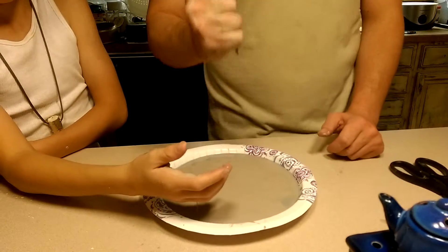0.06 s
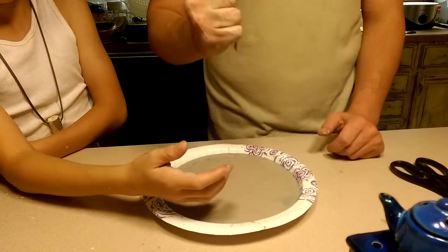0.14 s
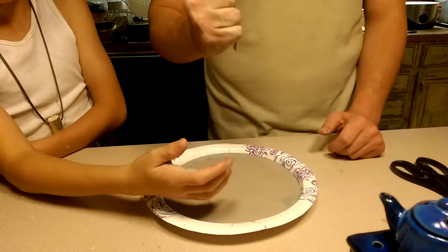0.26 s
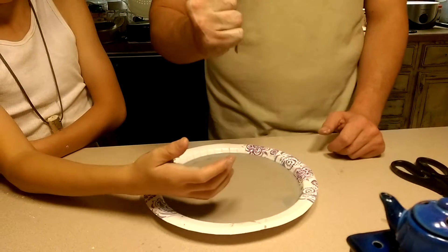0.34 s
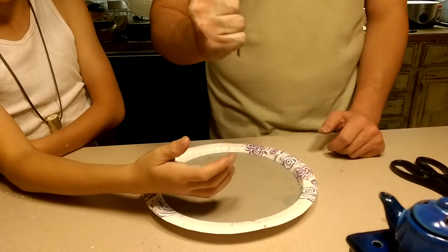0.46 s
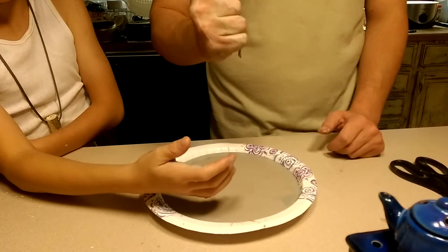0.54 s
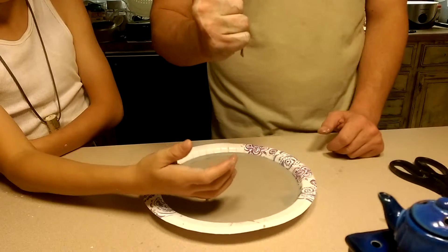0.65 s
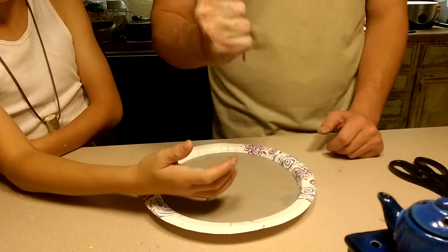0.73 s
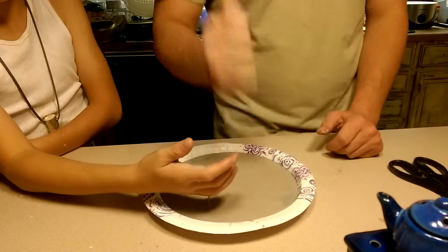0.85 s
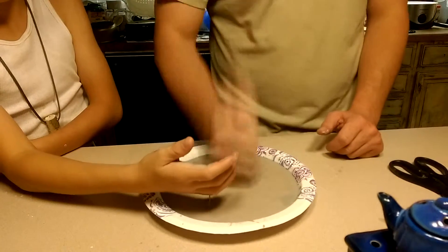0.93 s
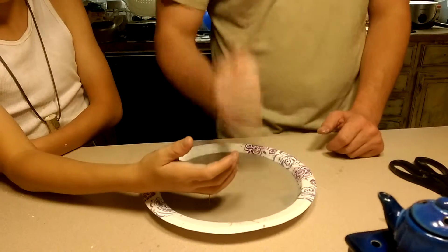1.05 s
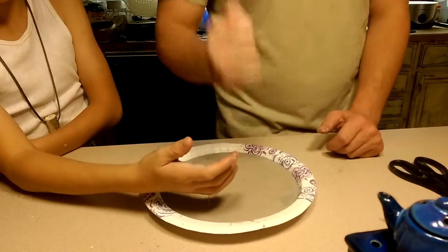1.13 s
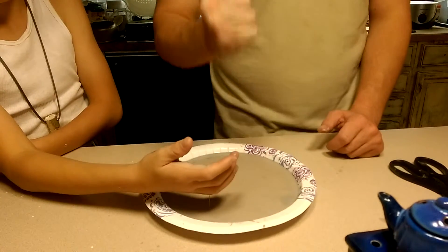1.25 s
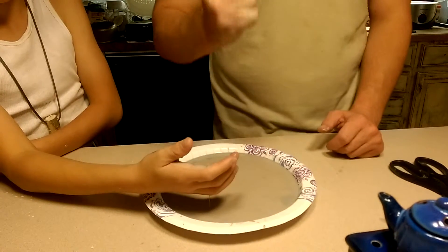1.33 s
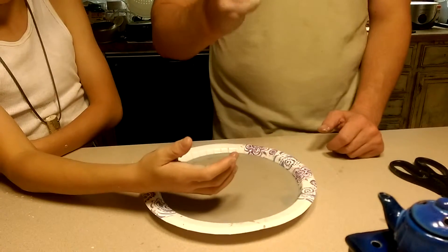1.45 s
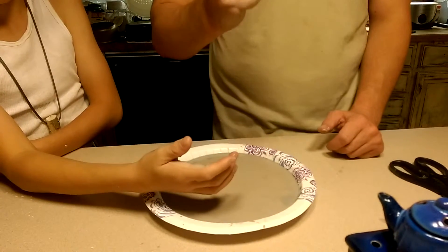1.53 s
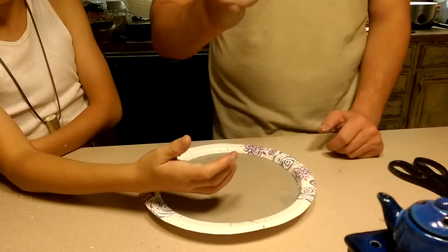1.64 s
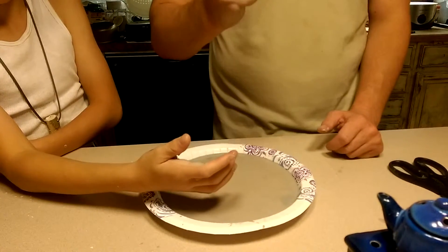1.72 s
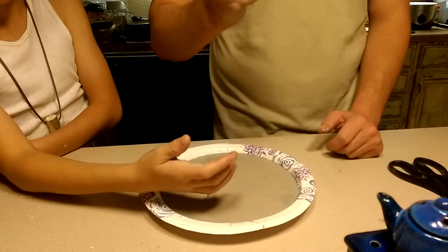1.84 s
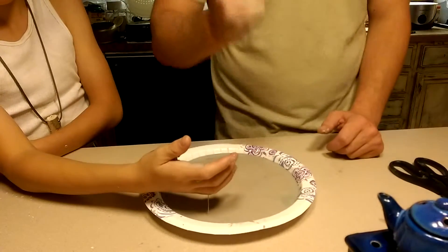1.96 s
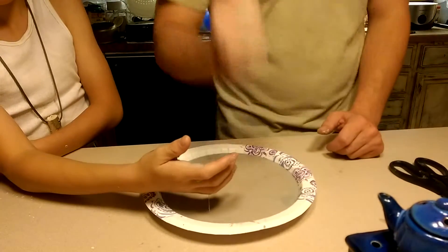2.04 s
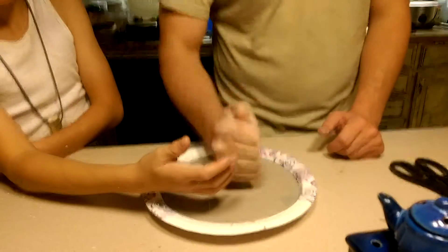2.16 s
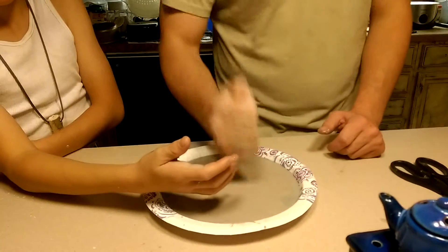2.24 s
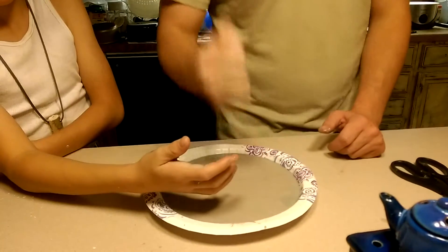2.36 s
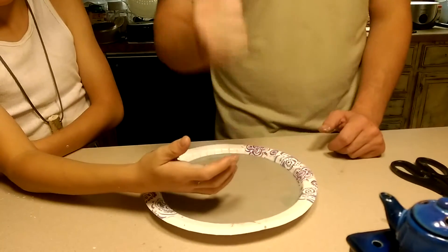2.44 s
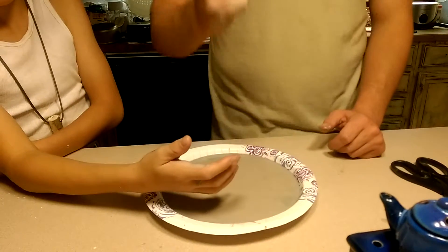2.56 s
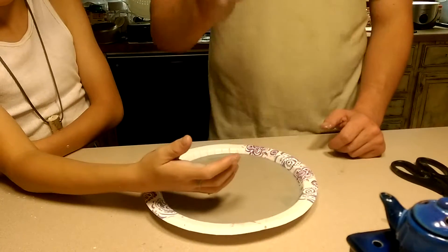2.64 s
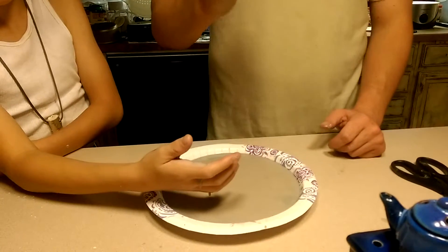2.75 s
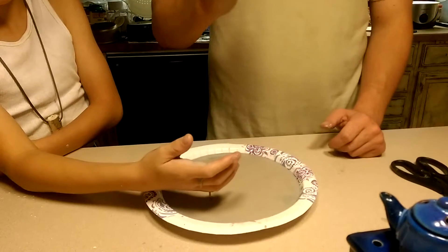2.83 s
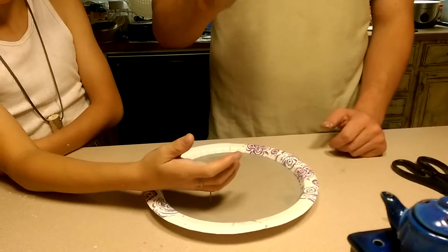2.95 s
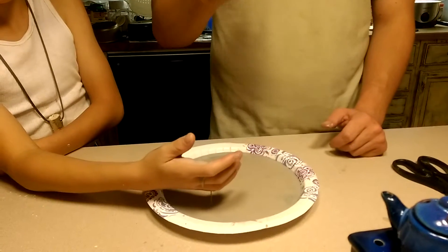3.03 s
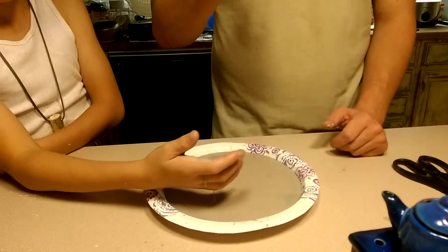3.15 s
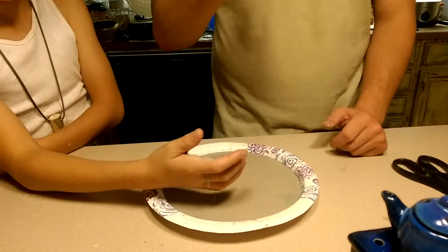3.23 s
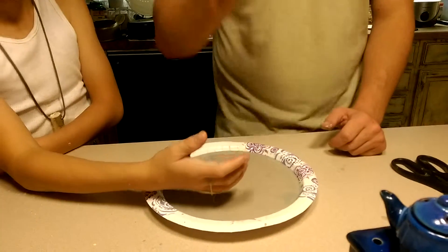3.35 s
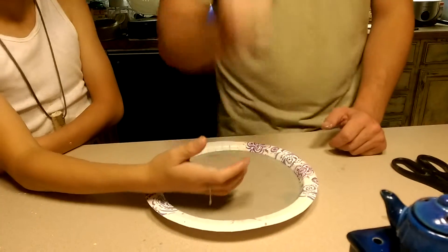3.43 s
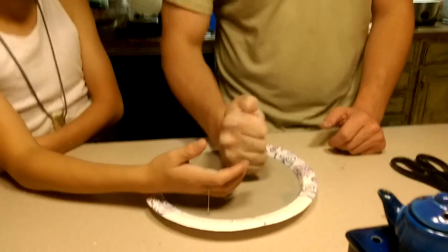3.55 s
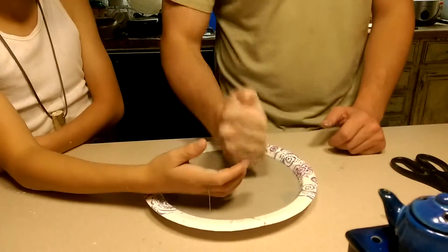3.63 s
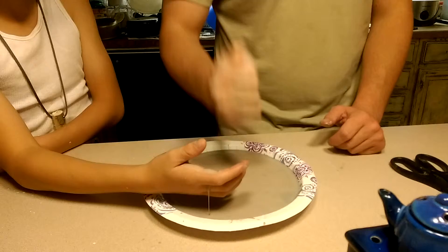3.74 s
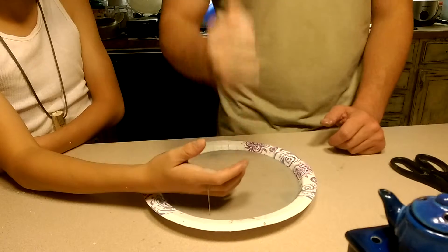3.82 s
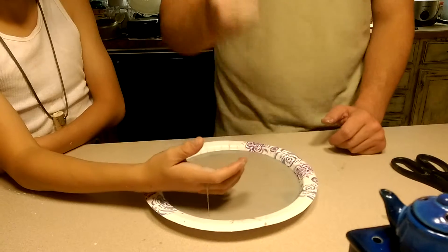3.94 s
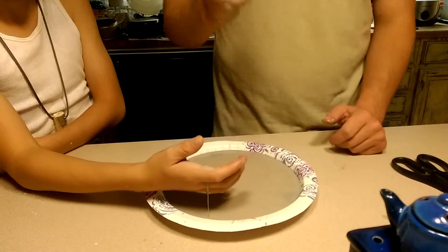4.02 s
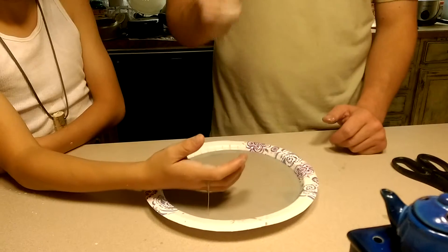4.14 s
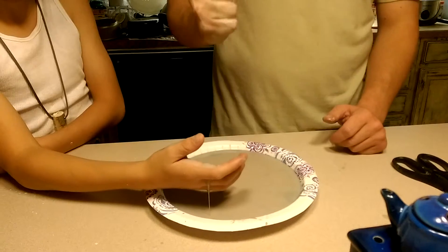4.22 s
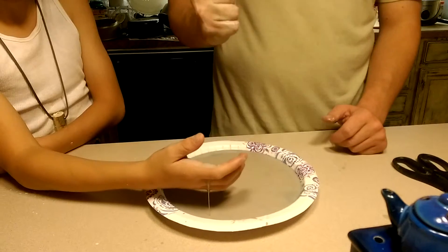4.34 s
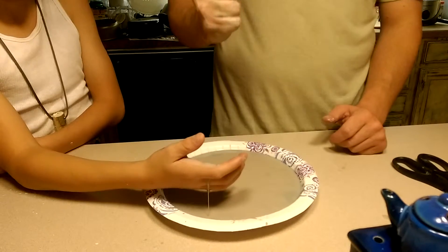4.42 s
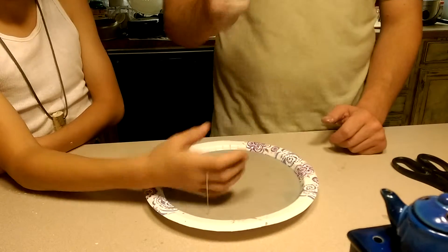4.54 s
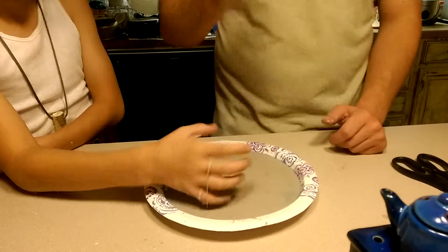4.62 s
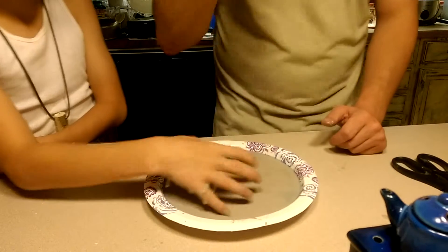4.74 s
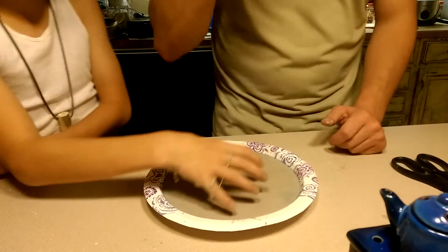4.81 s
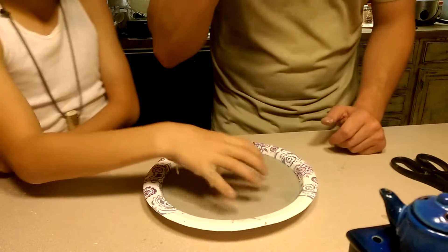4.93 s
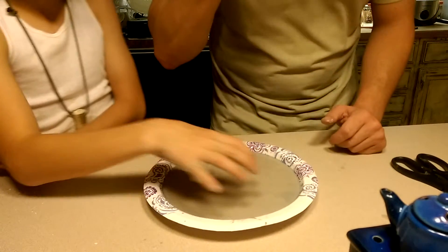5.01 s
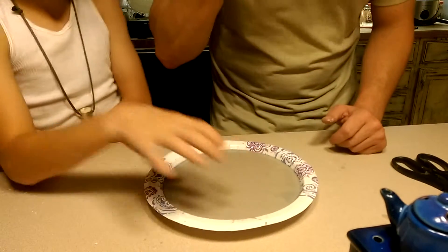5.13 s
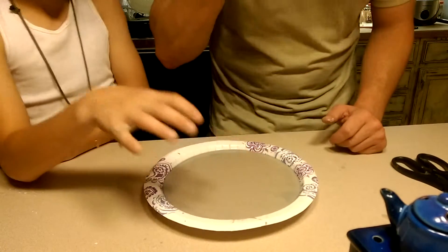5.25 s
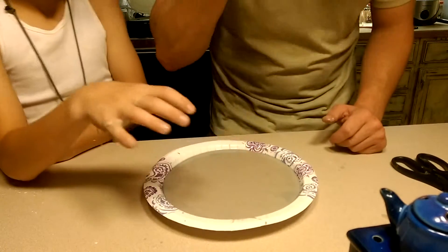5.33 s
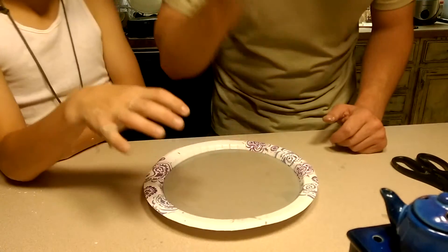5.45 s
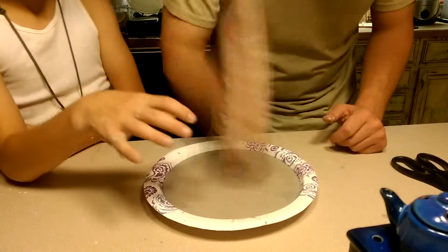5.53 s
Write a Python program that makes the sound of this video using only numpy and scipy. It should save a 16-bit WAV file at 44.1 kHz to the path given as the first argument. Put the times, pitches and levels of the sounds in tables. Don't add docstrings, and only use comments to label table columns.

```python
import sys
import numpy as np
from scipy import signal
from scipy.io import wavfile

SR = 44100
rng = np.random.default_rng(int(sys.argv[2]) if len(sys.argv) > 2 else 0)


def master_out(mix):
    frames = np.transpose(np.atleast_2d(mix))
    ceiling = np.clip(frames, -1, 1)
    pcm = np.round(ceiling * 32767).astype(np.int16)
    wavfile.write(sys.argv[1], SR, pcm)


def natural_amplitude(level_db):
    exponent = np.asarray(level_db, float) / 20
    return 10 ** exponent


N = 246078
EARLY_S = .3

# start in seconds, boom in dB, contact in ms, smack in dB, counter ring in dB.
BLOWS = [
    (-.17, -21, 4.5, -46, -26.5),
    (1.0353, -23, 5.7, -31.5, -33),
    (1.0378, -2.5, 9.7, -73, -23.5),
    (2.2103, 0, 5.5, -22.5, -19),
    (3.5914, 1, 4.9, -21, -13.5),
]
BLOW_SIDE = [1, 1, -1, 1, 1]
# start in seconds, peak in dB.
BOUNCES = [(1.07, -28), (1.272, -50), (2.245, -23), (2.306, -24), (3.624, -50), (3.671, -25), (3.69, -30.5)]
# pitch in Hz, level in dB, t60 in seconds.
SLAB_SWING_MODES = [(128, 6, 0.028), (144, -2, 0.077)]
# pitch in Hz, level in dB, t60 in seconds.
COUNTER_MODES = [(78.4, -17, 0.32), (85.5, -2, 0.29), (106.5, -4.5, 0.29), (147.65, 0, 0.12),
                 (149.8, -16.5, 1), (193.6, 1, 0.085), (234.3, -11.5, 0.61), (300, -17, 0.28),
                 (400.5, -27, 0.19), (537, -48, 0.37)]

# frequency in Hz, level in dB per Hz.
SMACK_SPECTRUM = [(120, -33), (200, 3.5), (298, 3), (365, -10), (497, -3), (1710, -18.5), (2960, -19),
                  (3680, -23.5), (4580, -30), (12200, -28.5), (15500, -30)]
CRACK_DB, CRACK_FOLLOWS = -7, 0.76

# start in seconds, peak in dB.
LID_HOPS = [(-.15, -16.5), (1.0537, -32.5), (1.074, -39), (2.2176, -14), (2.2303, -21.5), (2.2638, -23.5),
            (2.3294, -32.5), (3.6028, -17), (3.6241, -12.5), (3.6384, -16.5), (3.657, -27), (3.688, -22)]
# pitch in Hz, level in dB, t60 in seconds.
LID_MODES = [(2520, -6.5, 0.0081), (2780, -4.5, 0.016), (3016, -6, 0.023), (3310, -18.5, 0.05736),
             (4433, -6.5, 0.018), (4710, -7, 0.018), (5230, -12.5, 0.02), (6350, -15.5, 0.023)]
# pitch in Hz, level in dB, t60 in seconds.
POT_MODES = [(2985, -19, .5), (3030, -23, .3), (3385, -20, .45), (4645, -24, .25), (5160, -25, .25)]
POT_RING_DB, POT_RING_STEEP = -4, 1.5

# start in seconds, peak in dB, t60 in seconds.
RATTLES = [(-.16, -43.5, 0.99), (1.041, -24, 0.15), (1.076, -38, .15), (2.216, -19.5, 0.67),
           (3.597, -30, 0.73), (3.623, -26, 0.803)]

# start in seconds, peak in dB.
PATS = [(4.156, -47.5), (4.297, -54), (4.327, -32.5), (4.516, -48), (4.549, -58), (4.659, -42.5),
        (4.679, -44.5), (5.092, -49), (5.157, -76), (5.374, -53), (5.497, -46), (5.503, -32.5)]
# start in seconds, peak in dB.
ROCKS = [(4.341, -40.5), (5.03, -45.5), (5.071, -37.5), (5.099, -27.5), (5.112, -50), (5.129, -61),
         (5.161, -41), (5.191, -64), (5.243, -48.5), (5.349, -41), (5.513, -39.5), (5.539, -54)]
# pitch in Hz, level in dB, t60 in seconds.
PLATE_MODES = [(214, -23, 0.029), (313.5, -3.5, 0.05), (444, -6.5, 0.057), (511.4, -0.5, 0.091),
               (950, -22, .03)]
SLAP_DB, SLAP_FOLLOWS = -27, 0.34
ROCK_SLAP_DB = -15

# start in seconds, peak in dB, pitch in Hz, left-right in dB.
CLINKS = [(1.051, -23.5, 2500, 0), (1.06, -29, 3050, 2), (1.082, -32, 2870, 0), (1.05, -30.5, 4500, 12),
          (1.069, -32, 1650, 1), (2.413, -28.5, 893, 0), (3.318, -46.5, 3300, -11), (3.985, -49, 2750, 2),
          (3.995, -50, 3950, 12), (4.077, -45.5, 4080, 13), (4.09, -48, 4600, 0.5), (4.131, -52, 3050, 9),
          (4.146, -38, 2812, 22), (4.161, -29.5, 2780, 7), (4.413, -43, 2030, -5), (4.431, -52.5, 4956, .5)]
# start in seconds, peak in dB, pitch in Hz, left-right in dB.
POPS = [(2.243, -22, 850, 0), (3.296, -37, 3300, 6), (3.93, -45, 2160, -10), (4.0776, -42, 787, 10),
        (4.297, -45, 900, 0), (4.412, -46, 2500, 1.5), (5.499, -42, 950, 0)]
# start in seconds, peak in dB, left-right in dB.
SNAPS = [(3.129, -62, -17), (3.296, -50, 6), (3.935, -50, -7), (4.0775, -53, 13), (4.09, -51, -12),
         (4.413, -55.5, 3.5), (4.709, -60, 6), (5.1028, -61, -1), (5.184, -65, -5)]
CLINK_WIDTH_HZ, CLINK_CLICK_DB = 260, -22
POP_WIDTH_SHARE = 0.5

# frequency in Hz, t60 in seconds.
ROOM_T60 = [(100, 0.9), (300, 0.36), (1000, 0.85), (2500, 0.72), (5000, 0.69), (11000, 0.4)]
# frequency in Hz, left-right likeness [-1 to 1].
ROOM_LIKENESS = [(60, 0.33), (180, 1), (550, 0.74), (1650, 0.025), (4970, 0.023), (15000, 0.08)]
# frequency in Hz, left-right in dB.
ROOM_BALANCE = [(60, 13), (150, 2), (380, -6), (950, 0), (2380, -9), (5980, -2), (15000, -9.5)]

# frequency in Hz, level in dB per Hz.
HISS_SPECTRUM = [(25, -17), (70, -2.5), (120, -12), (300, -3.5), (450, -13.5), (870, -15), (1660, -19),
                 (2100, -11), (2800, -21), (4000, -14.5), (5000, -26), (6000, -30), (13000, -32),
                 (15500, -33.5)]
# pitch in Hz, level in dB, t60 in seconds.
CABINET_MODES = [(153.2, -3, 0.16), (230, -12.5, 0.78), (295, -9.5, 0.36), (600, -11.5, 0.14)]
# frequency in Hz, left-right likeness [-1 to 1].
HUM_LIKENESS = [(60, 0.48), (180, 0.81), (550, 0.528), (1650, -0.2), (4970, 0.061), (15000, -0.15)]
# frequency in Hz, left-right in dB.
HUM_BALANCE = [(60, 3.5), (180, -1.5), (550, 2), (1650, -3), (4970, -4.0), (15000, 0)]
# time in seconds, level in dB.
HUM_LEVEL = [(0, -62), (2.9, -60.5), (4.6, -56.5), (5.58, -57)]


def at_hz(points, hz):
    points = np.array(points)
    return np.interp(np.log(hz), np.log(points[:, 0]), points[:, 1])


def spot(s):
    return int(round((s + EARLY_S) * SR))


def add(line, s, piece):
    i = spot(s)
    line[..., i:i + piece.shape[-1]] += piece[..., :line.shape[-1] - i]


def ring(force, modes, spread_db=0.):
    out = 0
    for hz, db, t60 in modes:
        r, w = natural_amplitude(-60 / (t60 * SR)), 2 * np.pi * hz / SR
        gain = natural_amplitude(db + spread_db * rng.standard_normal(len(force)))
        out = out + signal.lfilter([0, np.sin(w)], [1, -2 * r * np.cos(w), r * r], force * gain + 1e-18)
    return out


def puff(length_s, low_hz, high_hz, rise_s=1e-4):
    t = np.arange(int(length_s * SR)) / SR
    band = signal.butter(2, [low_hz, high_hz], "band", fs=SR, output="sos")
    noise = signal.sosfilt(band, rng.standard_normal(len(t)))
    swell = 1 - np.exp(-t / rise_s)
    return noise / np.std(noise) / 2 * natural_amplitude(-40 * t / length_s) * swell


def grains(size, per_s, spread_db):
    sizes = natural_amplitude(spread_db * np.minimum(rng.exponential(1, size), 4)) * rng.choice([-1, 1], size)
    return sizes * (rng.random(size) < per_s / SR)


def placed(x, pan_db, lag):
    left = natural_amplitude(pan_db / 2) * np.roll(x, max(lag, 0))
    right = natural_amplitude(-pan_db / 2) * np.roll(x, max(-lag, 0))
    return np.array([left, right])


def stereo_bands(size, spectrum, likeness, balance, dying):
    out, t = 0, np.arange(size) / SR
    edges = 25 * 2 ** (np.arange(29) / 3)
    white = rng.standard_normal((2, 2, size))
    for k, (low, high) in enumerate(zip(edges, edges[1:])):
        band = signal.butter(2, [low, high], "band", fs=SR, output="sos")
        mid, side = signal.sosfilt(band, white[k % 2])
        hz = np.sqrt(low * high)
        alike = np.clip(at_hz(likeness, hz), -1, 1)
        lean = at_hz(balance, hz) / 2
        fade = natural_amplitude(-60 * t / at_hz(ROOM_T60, hz)) if dying else 1
        pair = np.sqrt(1 + alike) * mid + np.sqrt(1 - alike) * side * [[1], [-1]]
        out = out + natural_amplitude(at_hz(spectrum, hz)) * fade * pair * natural_amplitude(np.array([[lean], [-lean]]))
    return out / np.sqrt(np.mean(out ** 2))


def counter(size):
    swing, shake = np.zeros((2, size))
    for (s, boom_db, contact_ms, smack_db, ring_db), side in zip(BLOWS, BLOW_SIDE):
        contact = contact_ms * SR / 1000
        t = np.arange(int(contact)) / contact
        push = side * np.sin(2 * np.pi * t) / len(t)
        add(swing, s, natural_amplitude(boom_db + 0.5) * push)
        add(shake, s, natural_amplitude(ring_db - 6.0) * push)
        add(shake, s, natural_amplitude(ring_db - 53.5) * puff(0.61, 53, 870))
    t = np.arange(240) / 240
    for s, db in BOUNCES:
        add(shake, s, natural_amplitude(db + 1.5) * np.sin(2 * np.pi * t) / 120)
    return ring(swing, SLAB_SWING_MODES) + ring(shake, COUNTER_MODES)


def smack(size):
    out = np.zeros(size)
    for s, boom_db, contact_ms, smack_db, ring_db in BLOWS:
        add(out, s, natural_amplitude(smack_db) * puff(0.032, 66.7, 2450))
        add(out, s, natural_amplitude(CRACK_DB + CRACK_FOLLOWS * smack_db) * puff(0.0059, 1570, 11400))
    return out


def lid(size):
    knock, firm, skid = np.zeros((3, size))
    t = np.arange(int(0.035 * SR)) / SR
    for s, db in LID_HOPS:
        knock[spot(s)] = natural_amplitude(db - 9.5)
        firm[spot(s)] = natural_amplitude(POT_RING_STEEP * db + POT_RING_DB)
        add(skid, s, natural_amplitude(db - 16.5 - 60 * t / 0.042))
    strikes = knock + skid * grains(size, 5000.0, 0.61)
    return ring(strikes, LID_MODES, spread_db=-0.5) + ring(firm, POT_MODES)


def rattle(size):
    shaking, t = np.zeros(size), np.arange(int(.8 * SR)) / SR
    for s, db, t60 in RATTLES:
        add(shaking, s, natural_amplitude(db - 60 * t / t60))
    out = np.zeros((2, size))
    dealt = rng.integers(0, 24, size)
    clicks = shaking * grains(size, 9000., 1.84)
    for k, hz in enumerate(np.geomspace(300, 7000, 24)):
        mode = (hz, -12 - 0.81 * np.log2(hz / 1000), 7.4 / hz)
        out[k % 2] += ring(clicks * (dealt == k), [mode])
    return out + 0.34 * out[::-1]


def pats(size):
    push, slap = np.zeros((2, size))
    t = np.arange(300) / 300
    bump = np.sin(4 * np.pi * t) * np.hanning(300) / 150
    touches = [(s, db, SLAP_DB + SLAP_FOLLOWS * db) for s, db in PATS]
    touches += [(s, db, db + ROCK_SLAP_DB) for s, db in ROCKS]
    for s, db, slap_db in touches:
        add(push, s - .004, natural_amplitude(db + 7.5) * bump)
        add(slap, s - .004, natural_amplitude(slap_db) * puff(0.11, 327.1, 1007.0, rise_s=0.00068))
    return ring(push, PLATE_MODES) + slap


def ticks(size):
    out = np.zeros((2, size))
    tuned = [(*row, CLINK_WIDTH_HZ) for row in CLINKS]
    tuned += [(*row, POP_WIDTH_SHARE * row[2]) for row in POPS]
    for s, db, hz, pan_db, width_hz in tuned:
        burst = puff(0.05, hz - width_hz / 2, hz + width_hz / 2, rise_s=0.0015)
        add(out, s, natural_amplitude(db - 3.0) * placed(burst, pan_db, 0))
    clink_clicks = [(s, db + CLINK_CLICK_DB, pan_db) for s, db, hz, pan_db in CLINKS]
    for s, db, pan_db in [*SNAPS, *clink_clicks]:
        add(out, s, natural_amplitude(db) * placed(puff(0.042, 920, 8500), pan_db, 0))
    return out


def kitchen_tail():
    tail = stereo_bands(int(.9 * SR), SMACK_SPECTRUM, ROOM_LIKENESS, ROOM_BALANCE, dying=True)
    build_up = 1 - np.exp(-np.arange(tail.shape[1]) / (0.00067 * SR))
    return tail * build_up / np.sqrt(tail.shape[1])


def hum(size):
    hiss = stereo_bands(size, HISS_SPECTRUM, HUM_LIKENESS, HUM_BALANCE, dying=False)
    drone = natural_amplitude(-29) * ring(rng.standard_normal(size), CABINET_MODES)
    s, level_db = np.transpose(HUM_LEVEL)
    level = natural_amplitude(np.interp(np.arange(N) / SR, s, level_db))
    return level * (hiss + drone)[:, -N:]


def scene():
    size = spot(0) + N
    tail = kitchen_tail()
    slab, wet, china = counter(size), smack(size), lid(size)
    loose, fingers, small = rattle(size), pats(size), ticks(size)
    sent = natural_amplitude(19.5) * wet + natural_amplitude(5.5) * china + natural_amplitude(1) * loose.mean(0)
    sent = sent + natural_amplitude(8.5) * fingers + natural_amplitude(-5) * small.mean(0) + slab
    bright = signal.lfilter([1, -.93], [1], sent)
    echo = signal.fftconvolve(bright[None], tail, axes=1)[:, :size]
    near = slab * natural_amplitude(np.array([[.4], [-.4]])) + loose + fingers + small
    near = near + natural_amplitude(6.5) * placed(wet, -6.0, 11) + placed(china, 3.6, -2)
    return (near + echo)[:, -N:] + hum(size)


def roll_off(x):
    return signal.sosfilt(signal.butter(12, 16160, fs=SR, output="sos"), x)


def record(dry):
    thin = signal.sosfilt(signal.butter(2, 55, "high", fs=SR, output="sos"), dry)
    rounded = 1.055 * np.tanh(thin / 0.79)
    top_filter = signal.cheby2(10, 50, 16500, fs=SR, output="sos")
    mix = signal.sosfilt(top_filter, rounded)
    return roll_off(mix)


dry = scene()
out = record(dry)
master_out(out)
```